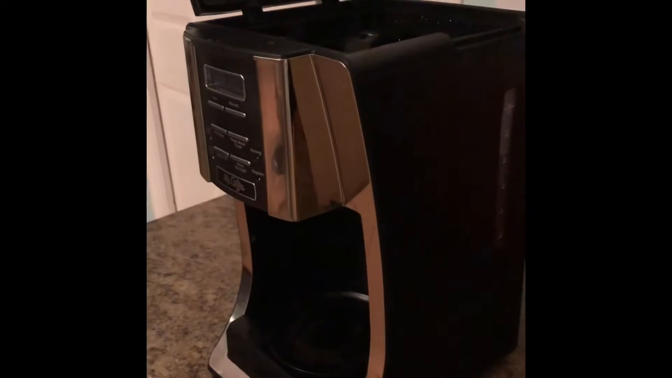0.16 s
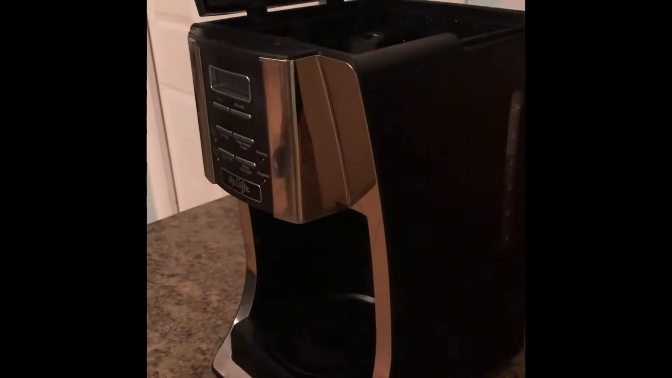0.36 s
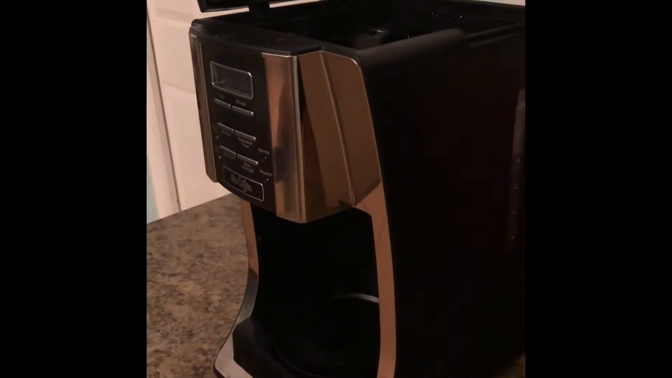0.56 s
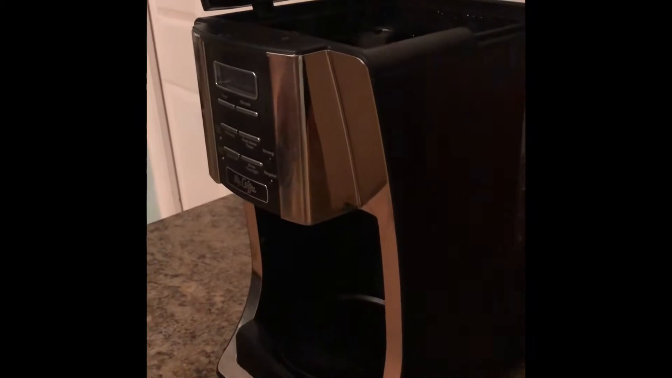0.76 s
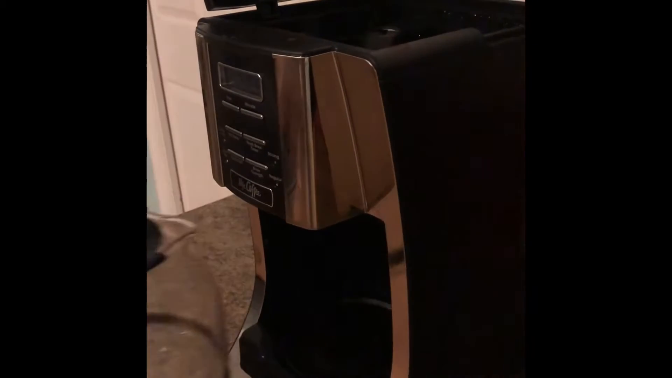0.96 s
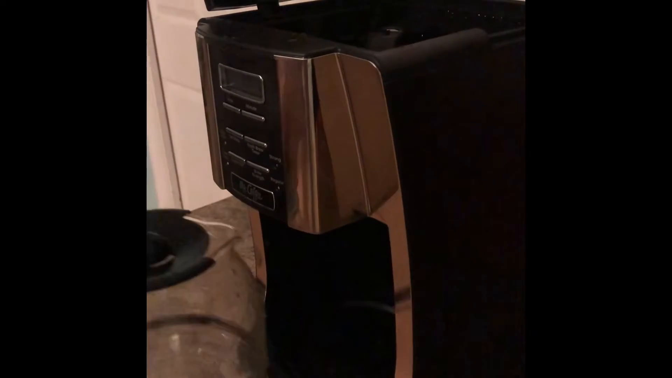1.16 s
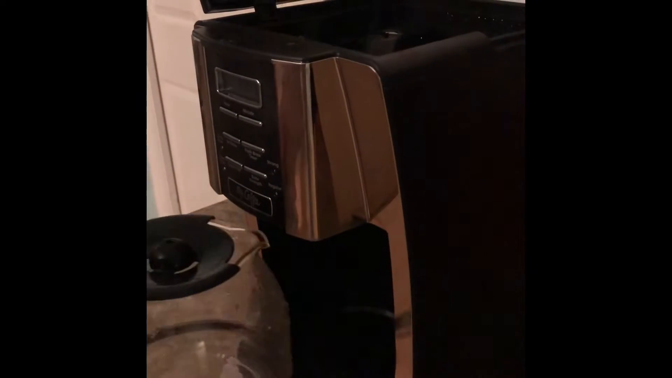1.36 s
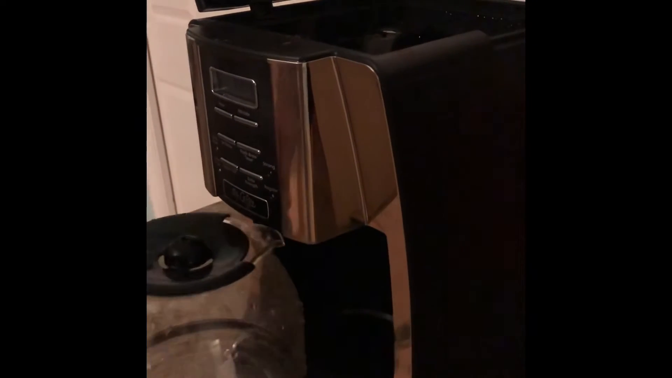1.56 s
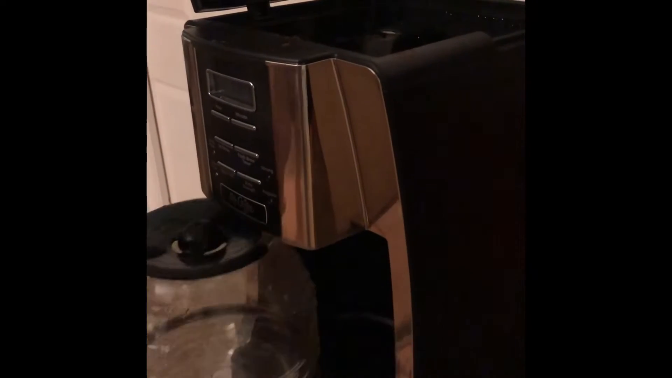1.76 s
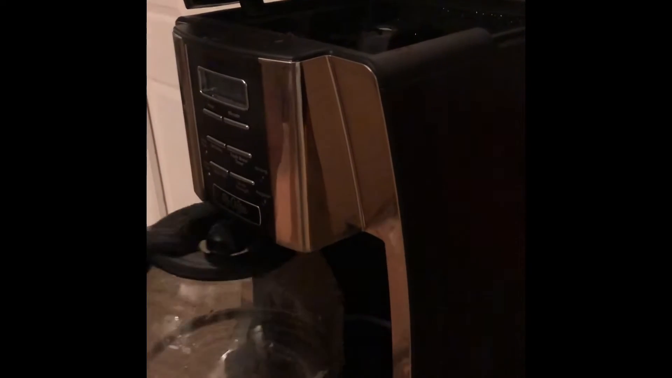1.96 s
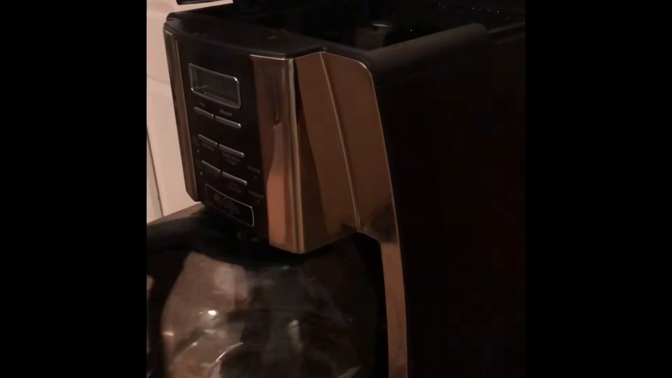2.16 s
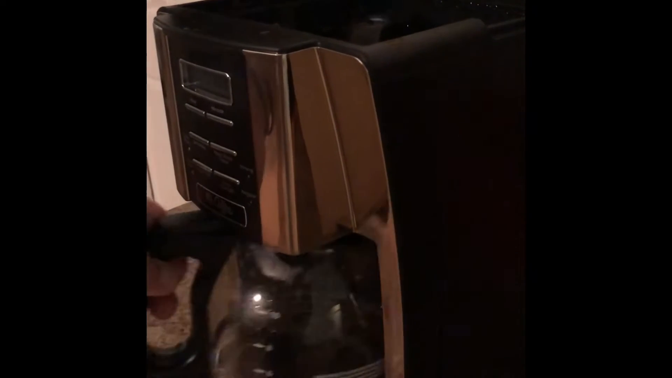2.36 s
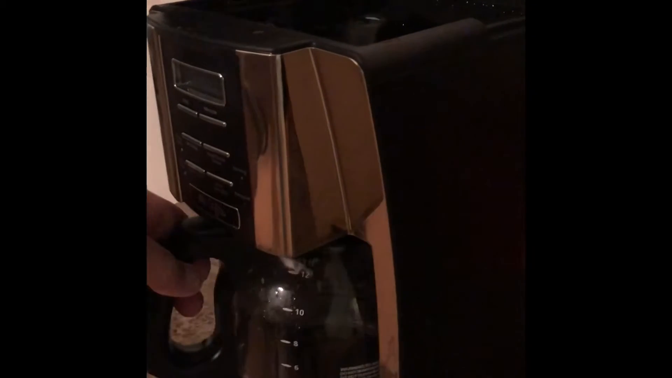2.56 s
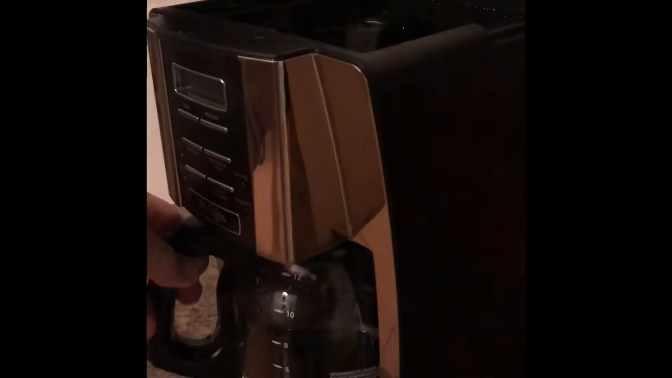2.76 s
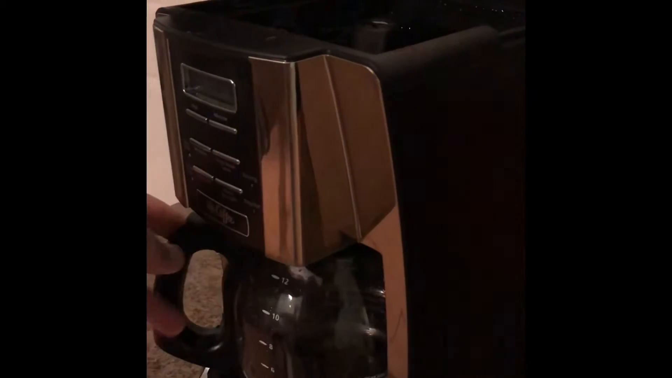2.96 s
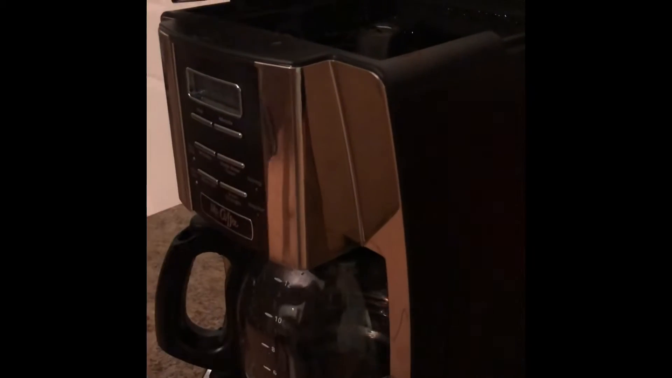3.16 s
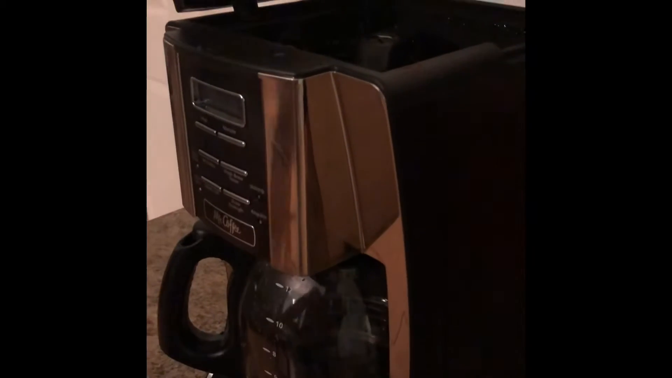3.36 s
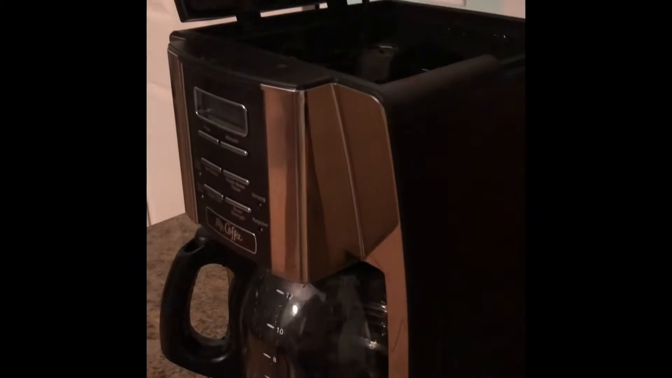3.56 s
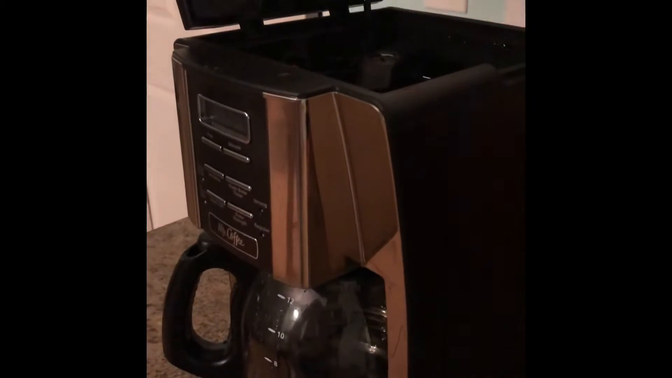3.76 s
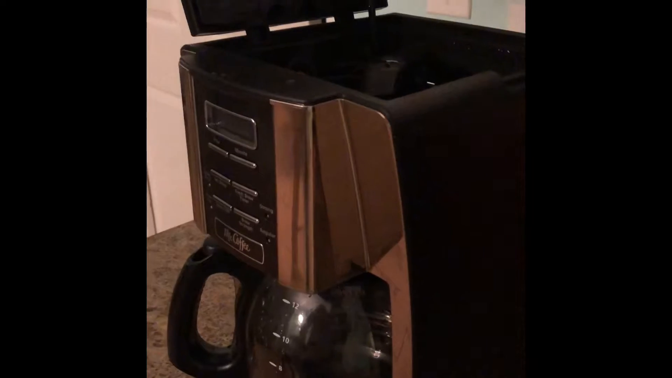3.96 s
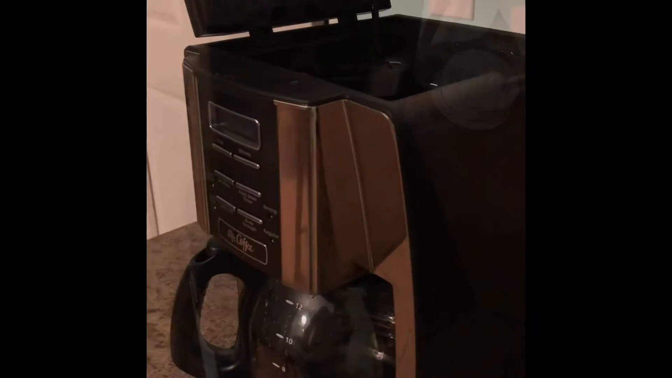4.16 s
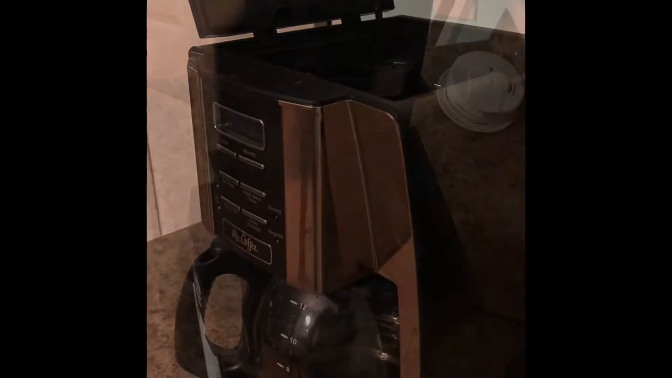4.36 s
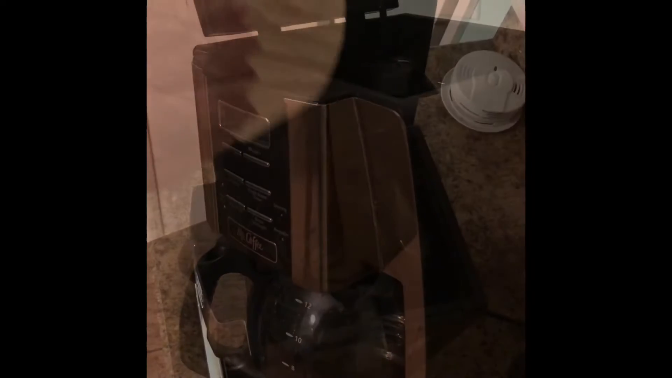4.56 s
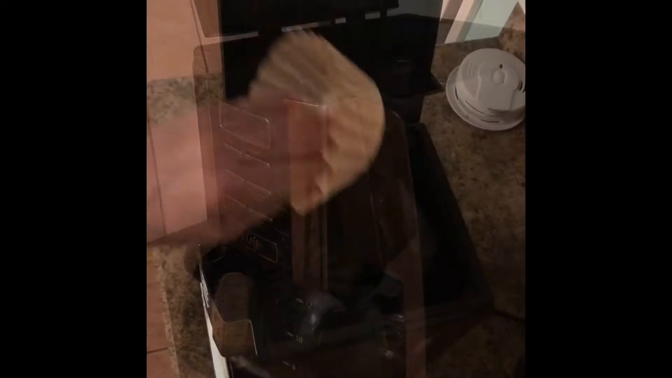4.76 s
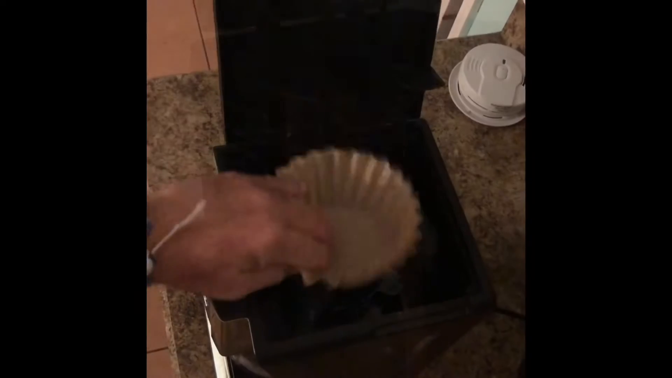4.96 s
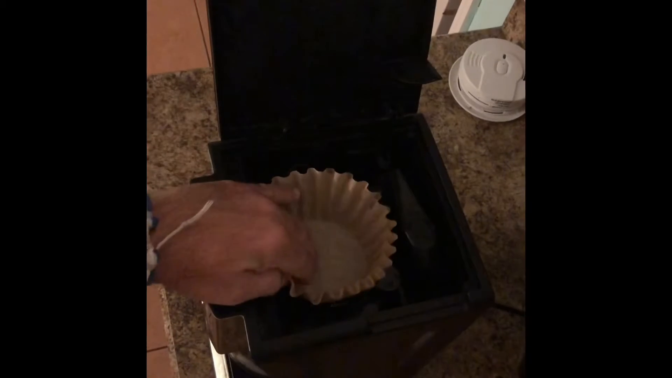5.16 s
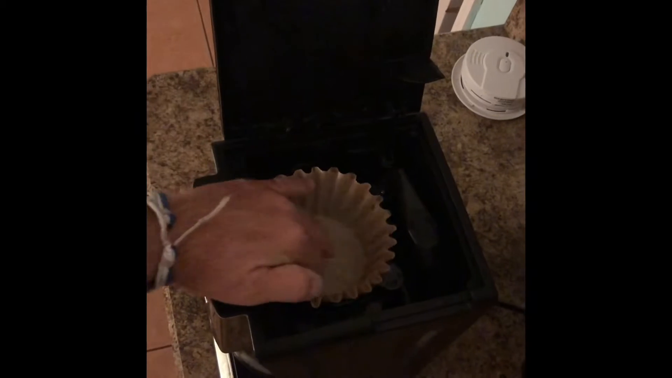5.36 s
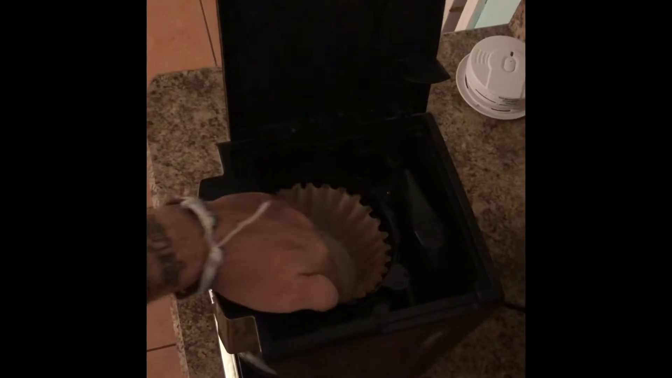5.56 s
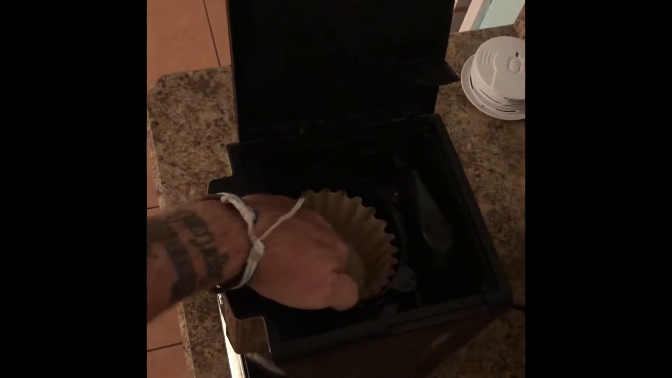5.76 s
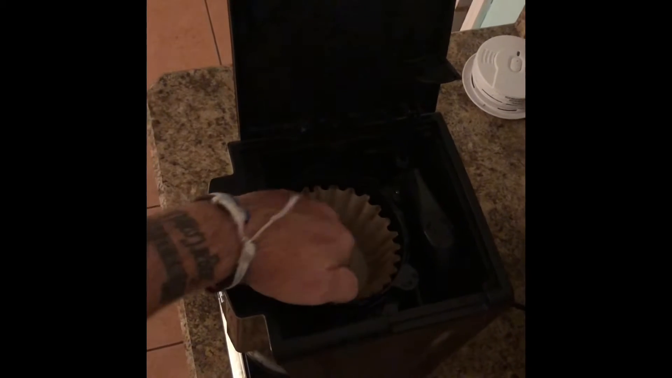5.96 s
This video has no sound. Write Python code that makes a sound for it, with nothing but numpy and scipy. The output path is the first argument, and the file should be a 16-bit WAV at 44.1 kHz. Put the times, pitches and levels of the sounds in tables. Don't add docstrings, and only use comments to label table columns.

```python
import sys
import numpy as np
from scipy import signal
from scipy.fft import rfft, irfft
from scipy.io import wavfile

SR = 44100
rng = np.random.default_rng(int(sys.argv[2]) if len(sys.argv) > 2 else 0)


def boost_factor(decibels):
    exponent = np.asarray(decibels, float) / 20
    return 10 ** exponent


def bounce(signal):
    frames = np.transpose(np.atleast_2d(signal))
    limited = np.clip(frames, -1, 1)
    pcm = np.round(limited * 32767).astype(np.int16)
    wavfile.write(sys.argv[1], SR, pcm)


N = 269010


def rms_one(x):
    return x / np.sqrt(np.mean(x ** 2) + 1e-20)


def band(x, low_hz, high_hz):
    sos = signal.butter(2, [low_hz, min(high_hz, 20000)], "band", fs=SR, output="sos")
    return signal.sosfilt(sos, x + 1e-18)


def high_pass(x, order, hz):
    return signal.sosfilt(signal.butter(order, hz, "high", fs=SR, output="sos"), x)


def drift(rate_hz):
    r = np.exp(-2 * np.pi * rate_hz / SR)
    wander = signal.lfilter([1], [1, -2 * r, r * r], rng.standard_normal(N + SR))
    return rms_one(wander[SR:])


def ring(push, modes):
    out = 0
    for k, (hz, db, t60) in enumerate(modes):
        r = boost_factor(-60 / (max(t60, .005) * SR))
        w = 2 * np.pi * hz / SR
        mode = signal.lfilter([0, np.sin(w)], [1, -2 * r * np.cos(w), r * r], push + 1e-18)
        out = out + (-1) ** k * boost_factor(db) * mode
    return out


def contacts(times, levels_db, decay_ms, lag_ms=0):
    push, t = np.zeros(N + 2000), np.arange(1500) / SR
    for s, db, ms in np.broadcast(times, levels_db, decay_ms):
        chatter = rng.standard_normal(len(t)) * np.exp(-t * 1000 / max(ms, .003))
        chatter[0] = np.sign(chatter[0]) * .4 * np.linalg.norm(chatter)
        at = round((s + max(lag_ms, 0) / 1000) * SR)
        push[at:at + len(t)] += boost_factor(db) * chatter / np.linalg.norm(chatter)
    return push[:N]


def grains(per_s, spread_db):
    sizes = boost_factor(spread_db * np.minimum(rng.exponential(1, N), 5)) * rng.choice([-1, 1], N)
    return rms_one(sizes * (rng.random(N) < per_s / SR))


def rubbed(rub, modes):
    return rms_one(sum(ring(np.roll(rub, 997 * k), [mode]) for k, mode in enumerate(modes)))


def strokes(start, length, db, swell_db, rise, fall):
    out, t = np.zeros(N), np.arange(N) / SR
    for s, span, level, change in np.broadcast(start, length, db, swell_db):
        corners = np.cumsum([s - rise * 3, rise * 2, rise, max(span, .001), fall, fall * 2])
        near = slice(int(corners[0] * SR), int(corners[-1] * SR))
        shape_db = np.interp(t[near], corners, [-90, -30, 0, change, change - 30, change - 90])
        out[near] += boost_factor(level + shape_db)
    return out


# start in seconds, housing peak in dB, then lid, glass and rim in dB against it.
KNOCKS = [(1.494, -21, -3, -6, -10), (1.505, -26, -20, -6, -16), (1.787, -20, -7, -16, -22),
          (1.794, -34, -5, -9, -14), (1.8635, -18.5, -1, -4, -17), (1.875, -23.5, -19, -5, -5),
          (2.051, -22, -13.5, -31, -40), (2.093, -30.5, -13, -33, -30.5), (2.177, -35, -16, -11, -25),
          (2.289, -44, 4, 20, 8.5), (2.294, -33, 3, 13, 13), (2.303, -26, -6, -4, -5.5),
          (2.327, -40, 4, -8, -30), (2.337, -38, 4, -10, -30), (2.416, -22, 1, -16, -46),
          (2.494, -31, -8, -18, -28.5), (2.545, -24, 12, 1, -20), (2.805, -35, 0, -13, -31),
          (2.824, -24, -1, -6, -27), (2.877, -33, -24, -14, -45), (2.918, -36, -22, -30, -35),
          (3.917, -52, -9, -11, -26)]
# tone in Hz, level in dB, t60 in seconds.
HOUSING = [(80.5, -8, 0.15), (147, -8, 0.064), (216.4, -8.5, 0.086), (279.5, -4.5, 0.073),
           (341.8, -2, 0.044), (430, -2.5, 0.042), (517, -3, 0.034)]
LID = [(704, 2, 0.019), (848, -0.5, 0.019), (1069, -1.5, 0.015), (1274, -4.5, .02), (1547, -8, 0.014)]
GLASS = [(2030, -3, .011), (2300, -3, .011), (2600, -4, .01), (2900, -6, .01), (3165, -7, .012),
         (3450, -5, .012), (3750, -9, .01), (4030, -8, .01), (4400, -8, .01), (4900, -8, .012)]
RIM = [(5680, -2, .008), (7200, -3, .008), (9000, -5, .006), (11300, -5, .006)]


def knocks():
    s, db, lid_db, glass_db, rim_db = np.transpose(KNOCKS)
    chatter_ms = 3.9
    out = np.zeros(N)
    for mode in HOUSING:
        hz = mode[0]
        out += ring(contacts(s, db - 8, chatter_ms + 600 / hz, lag_ms=2600 / hz - 4), [mode])
    for rel_db, modes, low_hz, high_hz, crack_db in ((lid_db, LID, 600, 1800, 22),
                                                     (glass_db, GLASS, 1800, 5300, 25),
                                                     (rim_db, RIM, 5300, 14000, 16)):
        even, odd, crack = [contacts(s, db + rel_db - 6.5, chatter_ms) for _ in range(3)]
        out += ring(even, modes[::2]) + ring(odd, modes[1::2])
        out += boost_factor(crack_db) * band(crack, low_hz, high_hz)
    return out


# start in seconds, tone in Hz, peak in dB, t60 in seconds.
SPOTS = [(1.496, 1330, -22, .01), (1.497, 470, -23, .05), (1.5, 330, -24, .047), (1.496, 695, -29, .03),
         (1.79, 515, -19.5, .045), (1.864, 3170, -24, .035), (1.865, 820, -28, .06),
         (1.866, 430, -17, .055), (1.868, 290, -23, .075), (1.876, 5040, -39, .05), (1.876, 4030, -35, .05),
         (1.866, 2040, -27, .028), (2.052, 400, -30, .03), (2.097, 450, -31, .04), (2.294, 2900, -21, .025),
         (2.293, 3160, -21, .035), (2.292, 7436, -32, .04), (2.296, 842, -26, .055),
         (2.294, 2050, -27, .025), (2.298, 241, -25, .086), (2.298, 1490, -35, .1), (2.328, 2950, -40, .05),
         (2.33, 3500, -44, .15), (2.493, 2400, -42, .025), (2.418, 630, -27, .04), (2.421, 205, -29, .097),
         (2.545, 880, -23, .025), (2.546, 2900, -21, .012), (2.552, 200, -29, .09), (2.835, 390, -31, .07),
         (2.827, 770, -27, .043), (2.826, 1050, -27, .025), (1.788, 4764, -52, .09),
         (1.788, 1378, -38, .045), (1.789, 802, -38, .07), (1.497, 3340, -36, .05), (1.498, 2040, -38, .04),
         (2.546, 3440, -24, .017), (2.546, 4468, -30, .02), (2.547, 576, -32, .04), (2.826, 3400, -37, .03),
         (2.826, 2439, -37, .028), (2.826, 4382, -40, .03), (3.918, 2000, -55, .035),
         (3.922, 2450, -59, .03)]


def spots():
    out = np.zeros(N)
    for s, hz, db, t60 in SPOTS:
        out += band(ring(contacts(s, db, 0), [(hz, 1.0, t60)]), hz / 1.7, hz * 1.7)
    return out


# start and length in seconds, rumble in dB, scrape and hiss in dB against it.
PUSHES = [
    (1.52, .22, -47.5, -15, -34),
    (1.8, .05, -56, -16, -27),
    (1.88, .38, -44, -14, -28),
    (2.32, .08, -52, 3, -21),
    (2.44, .1, -50, -6, -24),
    (2.56, .19, -48.5, -9, -26),
    (2.79, .03, -55, -12, -15),
    (2.85, .12, -50, -18, -28),
    (2.97, .2, -60, -19, -26),
]
# tone in Hz, level in dB, t60 in seconds.
PLATE = [(1420, -2, .022), (2050, -3, .022), (2700, -7, .015), (3050, -2, .018), (3400, -2, .025),
         (3700, -6, .015), (4420, -11, .025), (4820, -11, .025)]
# start in seconds, level in dB.
SLIPS = [(1.795, -67), (1.89, -52), (1.925, -56), (1.965, -59), (2.015, -59), (2.035, -58), (2.065, -62),
         (2.105, -58), (2.135, -61), (2.172, -61), (2.21, -66)]
# tone in Hz, level in dB, t60 in seconds.
SINGING = [(2050, -2, .04), (3180, 1, .035), (3590, -7, .05), (4020, -7, .06), (4410, -9, .05),
           (4750, -1, .07), (5140, -13, .06), (5960, -15, .04), (6890, -11, .055), (9380, -18, .02),
           (10200, -19, .03), (13900, -26, .025)]
# start and length in seconds, level in dB.
CHAFES = [
    (2.635, .015, -74),
    (2.68, .012, -72),
    (2.715, .02, -71),
    (2.75, .015, -76),
]


def slide():
    s, length, db, scrape_db, hiss_db = np.transpose(PUSHES)
    rub = grains(7000, 2.0) * boost_factor(1.8 * drift(30))
    rumble = rms_one(ring(rub, HOUSING[1:])) + .42 * rubbed(rub, LID)
    scrape = rubbed(rub, PLATE) + .7 * rms_one(band(rub[::-1], 1300, 4900))
    hiss = rms_one(band(rub, 5200, 14000))
    out = np.zeros(N)
    for layer, rel_db in ((rumble, 0), (scrape, scrape_db), (hiss, hiss_db)):
        out += layer * strokes(s, length, db + rel_db, -42 * length, rise=.03, fall=.07)
    slip_s, slip_db = np.transpose(SLIPS)
    out += strokes(slip_s, 0, slip_db, 0, rise=.015, fall=.07) * rubbed(rub, SINGING)
    out += strokes(2.527, .04, -72, 0, rise=.006, fall=.015) * rms_one(band(rub, 6500, 14500))
    out += strokes(*np.transpose(CHAFES), 0, rise=.012, fall=.025) * rms_one(band(rub, 5800, 8600))
    sleeve = strokes(3.92, .3, -69, -105 * .3, rise=.012, fall=.05)
    return out + sleeve * rms_one(band(rub, 780, 2300))


# start in seconds, peak in dB, lower ring in dB against it.
TICKS = [(2.9024, -60, -1), (2.9652, -67, 4), (3.0656, -69.5, 1), (3.104, -55, -14), (3.136, -75, -4),
         (3.1565, -59, -1), (3.275, -75.5, -0.5), (3.4242, -73, 1), (3.4456, -67.5, -1),
         (3.4765, -75.5, -3), (3.5563, -74, -6), (3.7604, -71, -2.5), (3.8781, -68, -5), (3.8924, -77, 2),
         (4.1535, -73.5, 3), (4.2345, -70, -5), (4.4981, -80.5, 4)]
# tone in Hz, level in dB, t60 in seconds.
TICK_LOW = [(3250, 0, .018), (3650, -5, .012)]
TICK_HIGH = [(4520, 0, .03), (4250, -10, .015)]
# start in seconds, peak in dB, centre in Hz.
CREAKS = [
    (3.0585, -65, 15300),
    (3.0744, -69, 12520),
    (3.2196, -64, 11280),
    (4.2477, -58, 9900),
    (4.5067, -68, 14220),
]


def ticks():
    s, db, low_db = np.transpose(TICKS)
    out = ring(contacts(s, db + 1.5, 0), TICK_HIGH) + ring(contacts(s, db + low_db + 3, 0), TICK_LOW)
    for s, db, hz in CREAKS:
        out += band(contacts(s, db + 27.5, 14.0), hz - 700, hz + 700)
    return out


# centre in Hz, width in Hz, level in dB.
PAPER = [(560, 300, 0), (780, 300, -3), (1800, 700, 1.5), (2400, 800, -3), (3600, 900, -4),
         (4500, 1100, -9), (6200, 1400, -8)]
# start and length in seconds, hiss in dB, swell in dB, hollow in dB against hiss.
STROKES = [(4.75, .04, -75, -3, 6), (4.815, .045, -56, 2, 0), (4.87, .025, -74, -3, 2),
           (4.905, .036, -52, -1, 7), (4.95, .135, -65, 2, 4), (5.105, .095, -62, -2, 0),
           (5.2, .05, -66, -8, 0), (5.385, .04, -62, 5, -8), (5.43, .033, -60, 4, 2),
           (5.47, .02, -60, 0, -4), (5.505, .045, -52, -7, -7), (5.575, .035, -58, 0, -7),
           (5.615, .018, -52, 0, -3), (5.645, .05, -67, 0, 6), (5.71, .035, -59, 0, -4),
           (5.768, .012, -61, 0, 0), (5.826, .03, -62, 5, -8), (5.86, .065, -54, -5, -3)]
# start and length in seconds, level in dB, swell in dB.
CRINKLES = [(4.75, .04, -84, -3), (4.815, .045, -65, 2), (4.904, .038, -64, -1), (4.87, .025, -79, 0),
            (4.95, .15, -73, 2), (5.1, .1, -68, -3), (5.2, .045, -72, -5), (5.385, .04, -68, 5),
            (5.425, .038, -63, 0), (5.47, .02, -68, 0), (5.5, .06, -63, -3), (5.575, .035, -65, 0),
            (5.615, .018, -61, 0), (5.645, .05, -80, 0), (5.71, .035, -69, 0), (5.768, .012, -73, 0),
            (5.825, .03, -64, 2), (5.86, .065, -62, -5)]
# start in seconds, peak in dB, top and low parts in dB against it.
SNAPS = [(4.816, -38, -17, -11), (4.849, -49, -10, -11.5), (4.9051, -42, -10, 7), (4.918, -41, -16, -17),
         (4.9254, -30, 0.5, -17), (4.941, -44, 0, -15), (4.9867, -53, -8, -15), (5.0556, -51, -13, -4),
         (5.1055, -38, -17, -8), (5.1541, -49, -5, 0), (5.3842, -57, -5, -3), (5.5036, -34, 0, -30),
         (5.515, -31.5, -21, -20), (5.5465, -38, 7, -29), (5.582, -45, -5, -20), (5.5909, -37, 9, -26),
         (5.6152, -38, 5, -3), (5.6285, -32, 0, -8), (5.6775, -50, -20, 12), (5.7136, -47, -7, -10),
         (5.731, -42, 5, -15), (5.7717, -43, -11, -5), (5.8217, -56, -5, -8), (5.8594, -35, 4, 0),
         (5.885, -44, -5, -5)]


def paper():
    rub = grains(7000, 2.6) * boost_factor(2.2 * drift(60))
    pleats = []
    for hz, width, db in PAPER:
        pleat = rms_one(band(rub, hz - width / 2, hz + width / 2))
        pleats.append(boost_factor(db + 4.2 * drift(22)) * pleat)
    hollow = rms_one(sum(pleats[:2]))
    hiss = rms_one(sum(pleats[2:]) + 1.4 * rms_one(band(rub, 1200, 7000)))
    crinkle = rms_one(band(grains(9000, 2.5), 4450, 17700)) * boost_factor(2.2 * drift(40))
    edges = dict(rise=.008, fall=.022)
    s, length, db, swell_db, hollow_db = np.transpose(STROKES)
    out = strokes(s, length, db, swell_db, **edges) * hiss
    out += strokes(s, length, db + hollow_db, swell_db, **edges) * hollow
    out += strokes(*np.transpose(CRINKLES), **edges) * crinkle
    s, db, top_db, low_db = np.transpose(SNAPS)
    out += band(contacts(s, db + 17.5, 1.1), 1360, 4800)
    out += band(contacts(s, db + top_db + 8, 1.4), 4700, 14500)
    return out + band(contacts(s, db + low_db + 22.5, 2.3), 325, 2060)


# start in seconds, peak in dB.
THUMPS = [
    (5.622, -26),
    (4.912, -37),
    (5.679, -29),
    (5.845, -36),
    (5.866, -30.5),
    (5.902, -38),
]
# tone in Hz, level in dB, t60 in seconds.
BASKET = [(143.5, -10, 0.12), (205, -2.5, 0.07), (258.4, 1, 0.09), (363, 2.5, 0.059), (500, 5, 0.021),
          (610, -14, 0.025)]


def basket():
    s, db = np.transpose(THUMPS)
    return ring(contacts(s, db - 12, 5.8), BASKET)


# band centre in Hz, t60 in seconds, level in dB.
KITCHEN = [(84.1, 0.79, -20), (200, .65, -19), (450, .6, -19.5), (1002.4, 0.72, -22), (2200, 0.66, -19.5),
           (4700, .43, -26.5), (10530, 0.2, -25.5)]


def kitchen(x):
    t, echo = np.arange(SR) / SR, 0
    for hz, t60, db in KITCHEN:
        tail = band(rng.standard_normal(SR), hz / 1.5, hz * 1.5)
        tail = tail * boost_factor(-60 * t / t60) * np.clip(t / .006, 0, 1)
        echo = echo + boost_factor(db) * tail / np.linalg.norm(tail) * np.sqrt(hz / 12000)
    return boost_factor(7.0) * signal.fftconvolve(x, echo)[:N]


# frequency in Hz, density in dB per Hz.
HUM = [(20, -30), (70, -0.5), (108, -10.5), (242, -2), (476, -14), (1000, -21.5), (2600, -28), (15000, -36)]
# time in seconds, level in dB.
HUM_LEVEL = [(0, -67), (3.3, -65), (4.2, -66), (4.4, -70), (4.75, -67), (5.3, -64.5), (6.1, -63.5)]


def hum():
    hz = np.fft.rfftfreq(N, 1 / SR) + 1
    points_hz, points_db = np.transpose(HUM)
    colour = boost_factor(np.interp(np.log(hz), np.log(points_hz), points_db))
    noise = rms_one(irfft(rfft(rng.standard_normal(N)) * colour, N))
    whistle_hz, width_hz = 4520, 300
    whistle = rms_one(band(rng.standard_normal(N), whistle_hz - width_hz / 2, whistle_hz + width_hz / 2))
    whistle = whistle * boost_factor(-27 + 1.9 * drift(5.5))
    treble = band(noise, 500, 20000)
    t = np.arange(N) / SR
    level_db = np.interp(t, *np.transpose(HUM_LEVEL))
    treble_db = np.interp(t, (4.4, 4.75), [-1.1, -3.4])
    return boost_factor(level_db + .5 * drift(6)) * (noise + (boost_factor(treble_db) - 1) * treble + whistle)


def scene():
    blows = high_pass(knocks() + paper() + basket(), 4, 115)
    tones = high_pass(spots() + ticks(), 4, 115)
    echo = kitchen(blows + .4 * tones)
    return (blows + tones + echo + slide() + hum())[None]


def low_pass(x):
    return signal.sosfilt(signal.butter(12, 16470, fs=SR, output="sos"), x)


def record(dry):
    thin = high_pass(dry, 2, 40)
    mix = signal.sosfilt(signal.cheby2(8, 40, 16600, fs=SR, output="sos"), thin)
    return low_pass(mix)


dry = scene()
out = record(dry)
bounce(out)
```